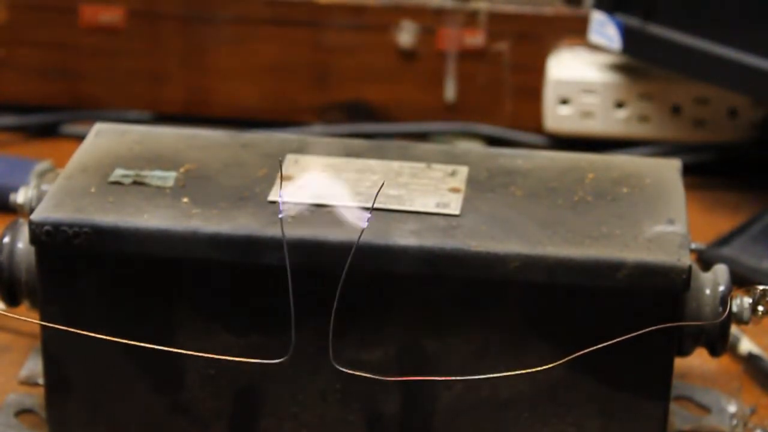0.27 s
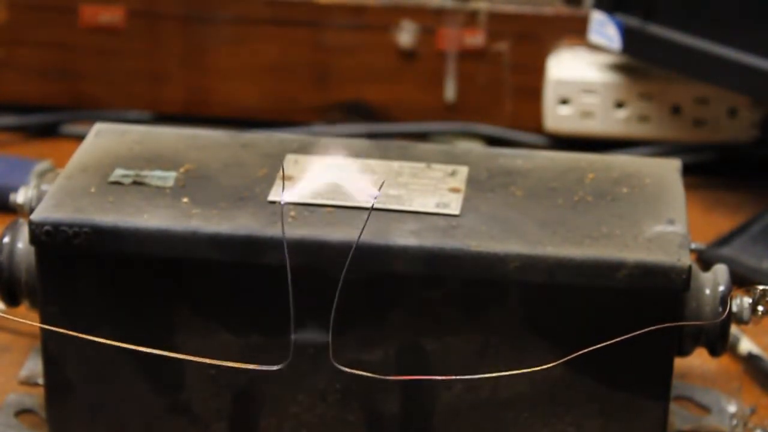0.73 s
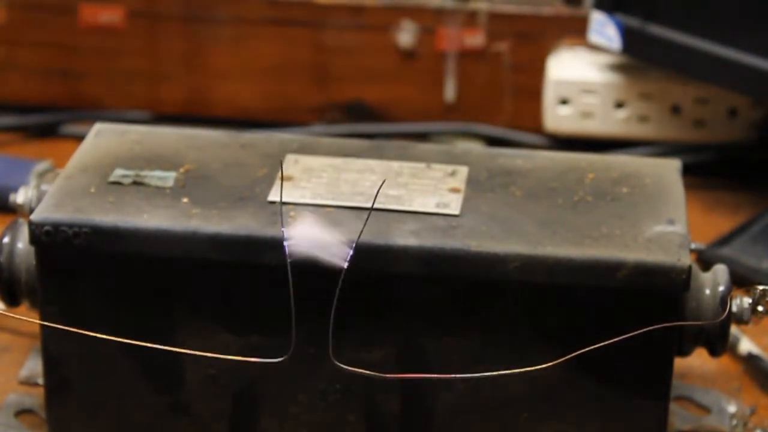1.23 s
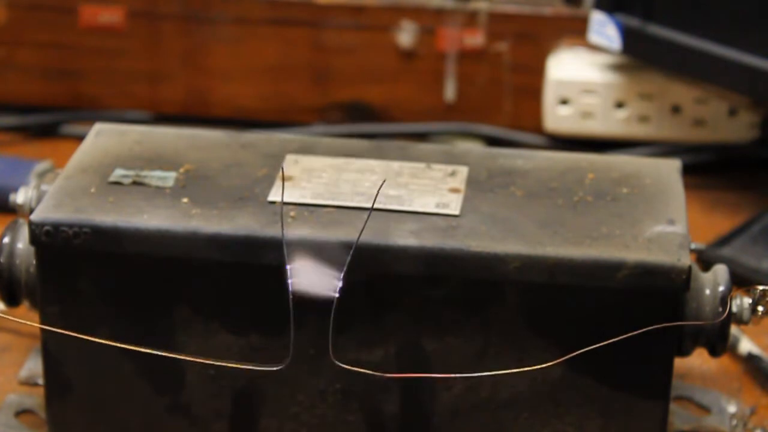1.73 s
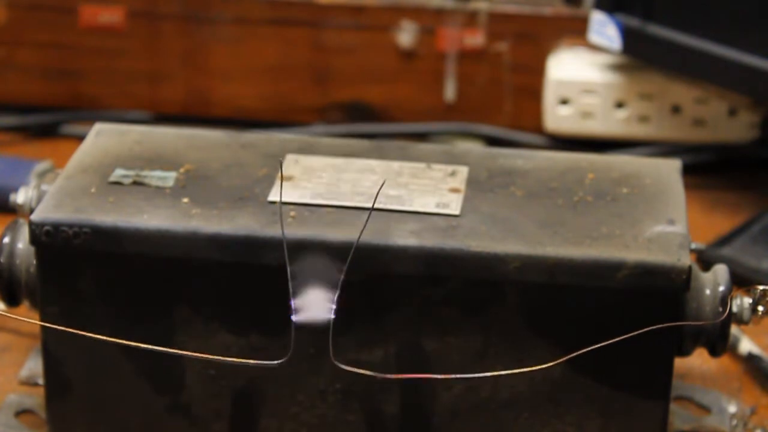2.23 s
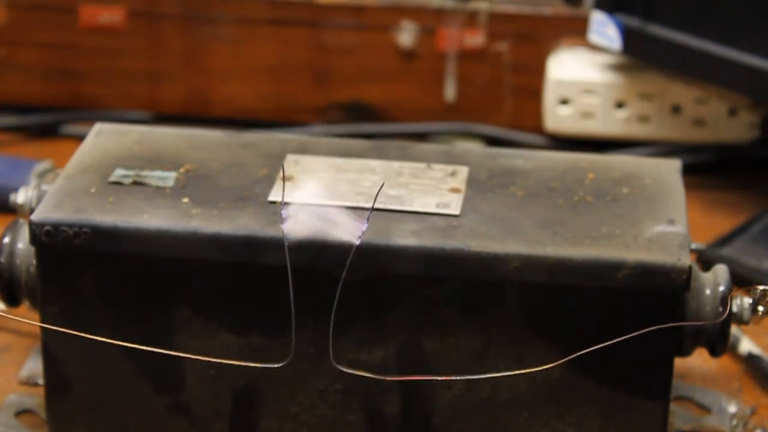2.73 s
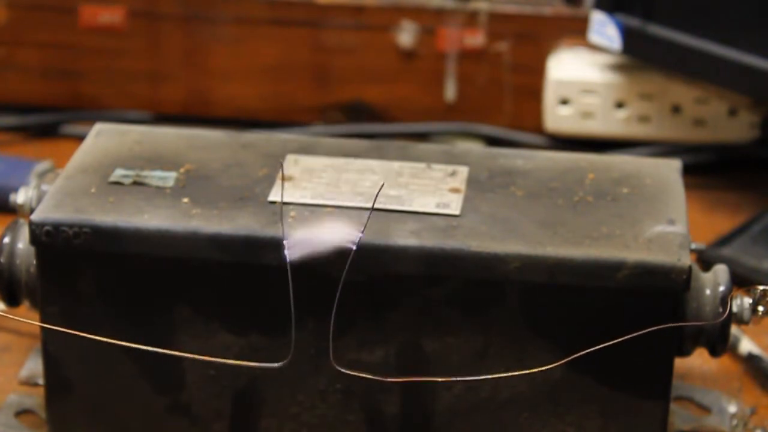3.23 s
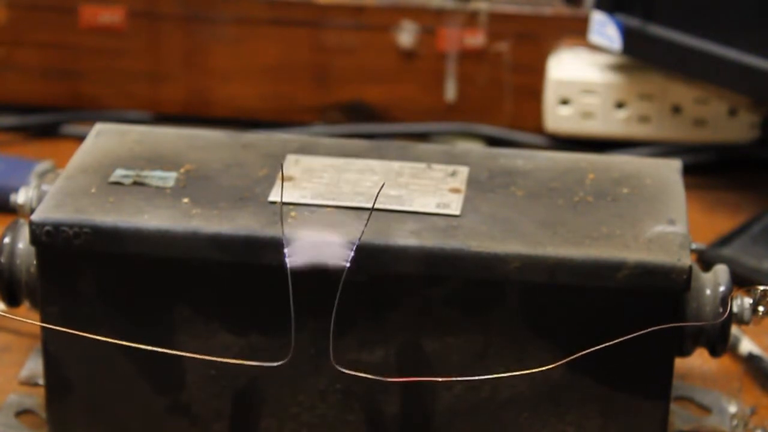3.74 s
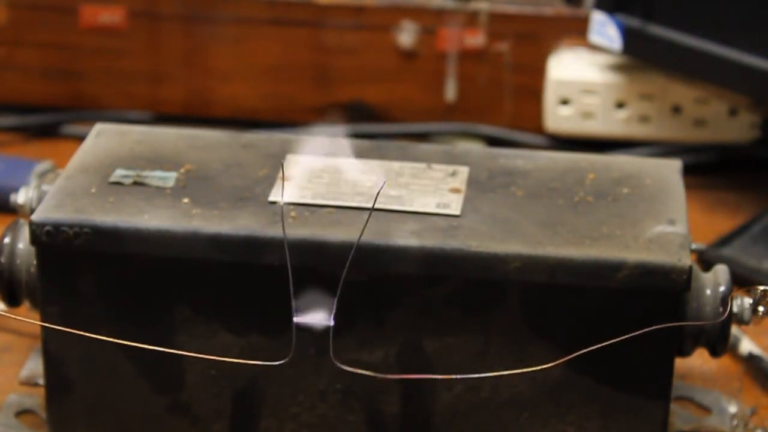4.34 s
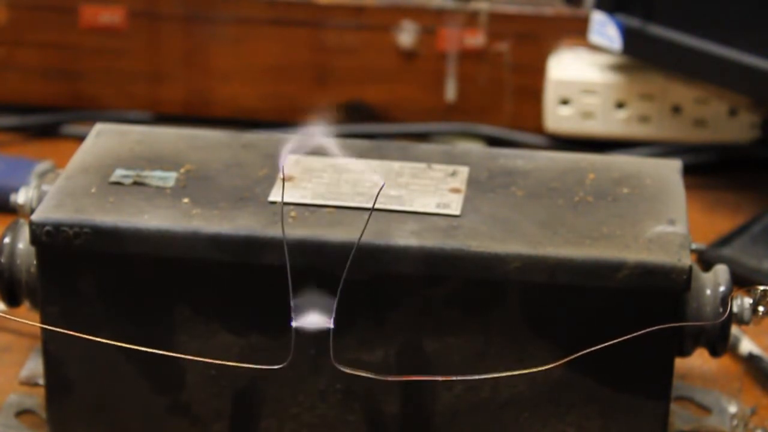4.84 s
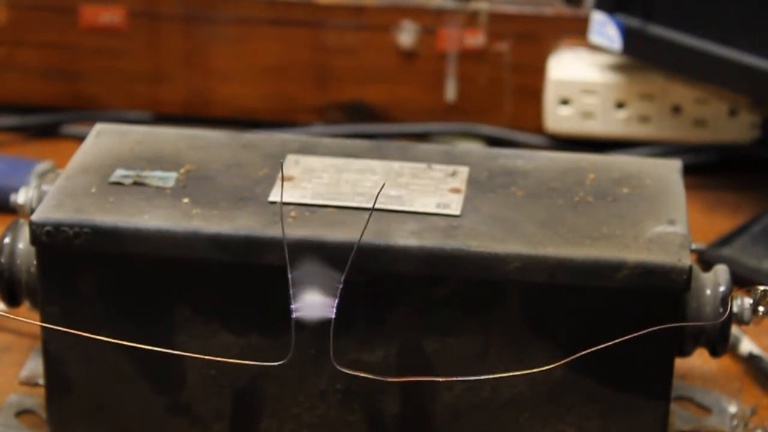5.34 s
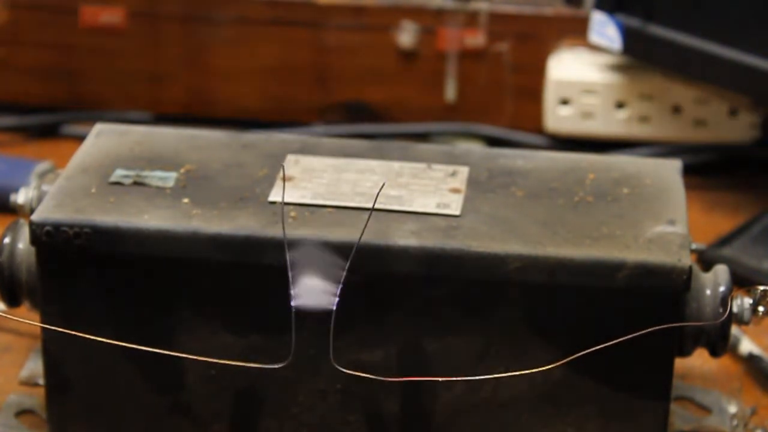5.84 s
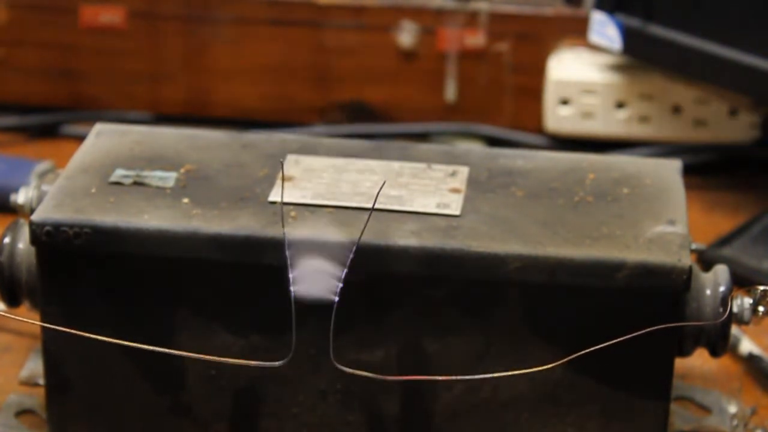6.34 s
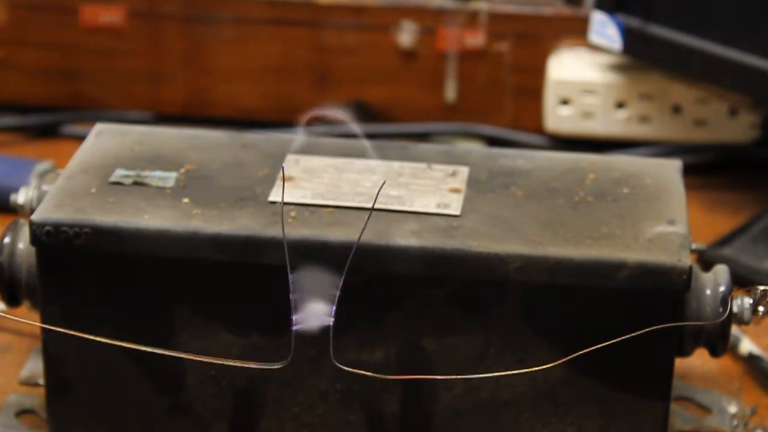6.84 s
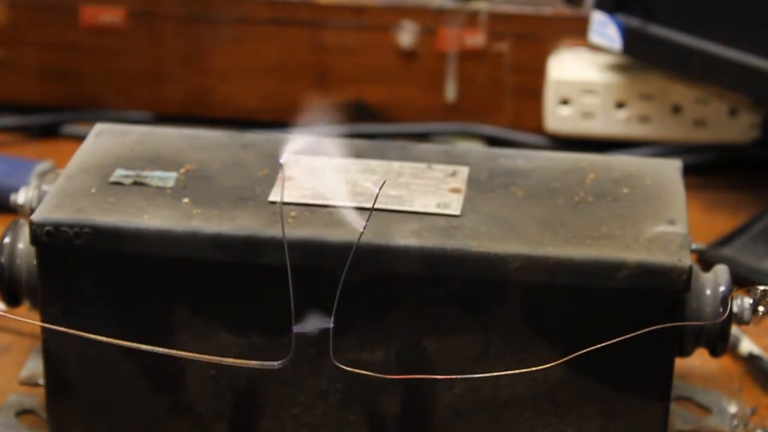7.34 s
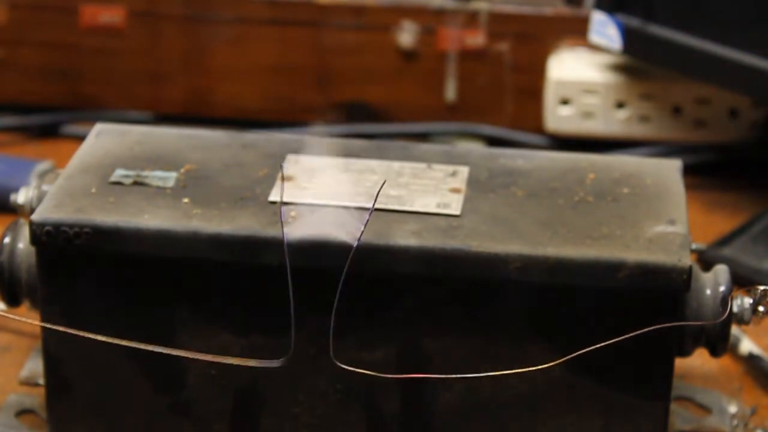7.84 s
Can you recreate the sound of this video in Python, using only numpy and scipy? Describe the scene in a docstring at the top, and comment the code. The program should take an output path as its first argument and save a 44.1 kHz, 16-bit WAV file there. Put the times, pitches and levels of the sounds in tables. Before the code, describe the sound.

Close, dry, bright electrical buzz at mains rate, repeatedly growing from faint ticking to loud crackle, each climb ending in a crisp snap.

```python
"""A small hard workshop, close to a transformer: an arc climbs between two wires in front of it, breaks
with a snap and strikes again below. It relights with a click on every half cycle of the mains; the longer
the arc, the earlier, louder and more sputtering the click. Casing and bench throw each click back, the
room adds a short tail, the arc column hums; behind lie noise, two whines and one dull scuff."""
import sys
import numpy as np
from scipy import signal
from scipy.fft import rfft, irfft
from scipy.io import wavfile
from scipy.ndimage import uniform_filter1d

SR = 44100
rng = np.random.default_rng(int(sys.argv[2]) if len(sys.argv) > 2 else 0)


def master_out(mix):
    """Clip the mix to full scale and print it as 16-bit PCM to the path in sys.argv[1]."""
    frames = np.transpose(np.atleast_2d(mix))
    ceiling = np.clip(frames, -1, 1)
    pcm = np.round(ceiling * 32767).astype(np.int16)
    wavfile.write(sys.argv[1], SR, pcm)


N = 356328

# half cycles a second; the first instant from which leads are counted back
PULSE_HZ, FIRST_S = 120.047, .0051

# The break that ends each climb: (time [s], level [dB], share of the lower part, below 8 kHz [dB],
# thump strength [dB], thump frequency [Hz])
SNAP_EVENTS = [(0.1791, -28.2, -7.5, -44.0, 3130), (0.4125, -26.5, -11.7, -45.7, 2400),
               (0.6208, -27.4, -9.7, -46.5, 2300), (0.8451, -24.8, -9.2, -42.3, 3140),
               (1.0037, -25.2, -10.8, -41.4, 3010), (1.2119, -30.9, -5.2, -49.9, 2290),
               (1.5122, -25.8, -10.1, -43.3, 2950), (1.7285, -26.3, -9.8, -47.5, 3030),
               (2.0615, -23.2, -3.1, -42.0, 3460), (2.2698, -26.3, -8.7, -41.3, 3060),
               (2.4701, -26.5, -9.9, -45.0, 3120), (2.6701, -26.3, -8.8, -43.8, 2990),
               (2.9363, -26.3, -9.9, -41.6, 2960), (3.1361, -25.3, -8.8, -49.1, 2280),
               (3.3862, -25.8, -10.6, -45.5, 3040), (3.6445, -26.6, -10.5, -48.0, 2240),
               (3.9109, -26.9, -8.1, -46.7, 2950), (4.1695, -26.9, -9.9, -42.1, 2890),
               (4.4023, -27.5, -8.4, -43.6, 2990), (4.6441, -28.2, -8.4, -40.4, 2980),
               (4.8942, -23.6, -3.0, -43.4, 3260), (5.1608, -29.4, -10.4, -44.9, 2980),
               (5.3771, -28.4, -8.2, -47.9, 3070), (5.6766, -25.2, -9.4, -42.4, 3100),
               (5.8604, -26.9, -9.6, -46.2, 3120), (6.0603, -29.3, -8.6, -50.4, 2330),
               (6.327, -28.5, -9.3, -47.2, 2990), (6.5186, -26.5, -11.6, -42.2, 3060),
               (6.6852, -26.3, -10.0, -43.0, 2970), (6.8849, -27.0, -9.1, -41.5, 3070),
               (7.0762, -24.1, -3.7, -44.5, 3500), (7.2601, -26.9, -11.3, -42.2, 3150),
               (7.4347, -30.6, -8.0, -45.0, 2910), (7.6097, -27.9, -10.6, -45.4, 2980),
               (7.7928, -27.7, -8.5, -44.9, 3040), (7.9847, -27.7, -11.1, -44.2, 3170)]
# The loudest relights of the long arc: (time [s], level [dB], restrike rate [1/s])
CRACK_EVENTS = [(0.1706, -30.0, 4500), (0.3292, -30.0, 10400), (0.3458, -30.2, 8600), (0.3542, -27.0, 7400),
                (0.3708, -27.1, 9800), (0.379, -30.2, 11400), (0.3957, -27.6, 6800), (0.4041, -23.1, 11000),
                (0.5459, -29.1, 11000), (0.5541, -27.0, 9000), (0.5622, -30.4, 10400),
                (0.5705, -29.6, 11000), (0.579, -28.1, 7800), (0.5873, -29.6, 4800), (0.6119, -30.0, 6400),
                (0.7624, -29.7, 10400), (0.779, -27.8, 10400), (0.7873, -28.8, 9800), (0.804, -28.0, 7800),
                (0.8204, -25.5, 8400), (0.8286, -29.5, 4500), (0.8371, -23.2, 4900), (1.1954, -29.2, 7400),
                (1.3455, -28.9, 11800), (1.362, -29.3, 12600), (1.4204, -27.8, 11000),
                (1.4287, -28.9, 6700), (1.4371, -30.0, 6400), (1.4536, -26.8, 6100), (1.4619, -29.9, 5100),
                (1.4702, -27.3, 5300), (1.4784, -29.1, 4900), (1.4867, -26.8, 6100), (1.5033, -25.2, 6300),
                (1.6619, -27.3, 11400), (1.6701, -30.2, 7500), (1.6785, -28.3, 6500), (1.6864, -27.5, 9300),
                (1.6952, -28.4, 5300), (1.7034, -24.7, 6800), (1.72, -22.9, 7800), (1.8953, -30.5, 10400),
                (1.9452, -28.4, 12200), (1.9619, -28.9, 10700), (1.9785, -28.2, 6500),
                (1.9951, -30.4, 6000), (2.0117, -27.5, 4800), (2.0198, -30.0, 6800), (2.028, -30.4, 6700),
                (2.0366, -25.2, 9800), (2.045, -26.4, 6700), (2.0532, -28.8, 5500), (2.2532, -25.6, 5300),
                (2.2616, -22.1, 7400), (2.4613, -30.7, 7100), (2.6365, -28.9, 5900), (2.6449, -29.1, 8600),
                (2.653, -29.8, 7800), (2.6612, -30.1, 7400), (2.8364, -29.4, 8200), (2.8613, -29.2, 5200),
                (2.8695, -29.3, 10700), (2.8781, -27.4, 7400), (2.8863, -27.8, 5400), (2.8946, -27.4, 6000),
                (2.9109, -28.1, 5100), (2.9278, -25.7, 6400), (3.1111, -29.3, 8400), (3.1194, -24.9, 6500),
                (3.1277, -28.2, 7400), (3.3694, -28.6, 7200), (3.3775, -27.5, 7500), (3.6109, -28.6, 7800),
                (3.6191, -25.3, 7100), (3.6274, -27.1, 8600), (3.6357, -27.5, 4600), (3.8776, -28.4, 8000),
                (3.8939, -27.0, 7500), (3.9026, -25.6, 6100), (4.1442, -30.5, 7200), (4.1524, -27.8, 4500),
                (4.1606, -26.6, 5700), (4.3937, -25.5, 6100), (4.594, -29.3, 10400), (4.6025, -30.1, 7800),
                (4.6272, -26.5, 7700), (4.6355, -23.3, 6300), (4.8604, -29.1, 7500), (4.8686, -29.8, 5700),
                (4.8773, -25.2, 7500), (4.8853, -27.8, 5700), (5.0772, -28.5, 9300), (5.0937, -28.2, 6300),
                (5.1104, -29.1, 7100), (5.1439, -27.4, 6800), (5.352, -30.4, 8800), (5.3604, -26.6, 4800),
                (5.552, -30.5, 8600), (5.5602, -27.3, 5300), (5.5768, -24.1, 6800), (5.5935, -23.5, 4800),
                (5.6101, -25.5, 6500), (5.6268, -27.2, 6900), (5.6436, -27.9, 7500), (5.6602, -24.1, 6100),
                (5.8516, -26.7, 4900), (6.0103, -27.9, 6800), (6.0268, -27.2, 6900), (6.0352, -29.4, 6700),
                (6.0433, -26.2, 5900), (6.0517, -27.3, 7400), (6.2102, -29.7, 6100), (6.2268, -28.0, 6800),
                (6.2433, -24.3, 6400), (6.26, -25.9, 6100), (6.2932, -25.1, 5800), (6.3098, -28.8, 6500),
                (6.5098, -26.5, 6500), (6.6517, -29.1, 7800), (6.66, -30.1, 5000), (6.6681, -27.4, 6800),
                (6.6764, -22.9, 6200), (6.8432, -27.7, 11800), (6.8515, -28.6, 6000), (6.8597, -28.5, 7200),
                (6.868, -29.0, 5600), (6.8762, -27.7, 5900), (7.0431, -27.7, 11000), (7.0597, -25.8, 6800),
                (7.2431, -28.2, 6500), (7.4179, -29.7, 5000), (7.5929, -27.0, 6100), (7.7597, -29.7, 10100),
                (7.7678, -25.9, 7100), (7.7761, -25.4, 11000), (7.7842, -28.6, 4600),
                (7.9262, -30.0, 10700), (7.9428, -28.0, 5800), (7.9595, -29.1, 6000), (7.976, -24.9, 9500)]
SNAP_S, CRACK_S = np.transpose(SNAP_EVENTS)[0], np.transpose(CRACK_EVENTS)[0]


def gain_of(db):
    """Amplitude factor of a level in dB."""
    return 10 ** (np.asarray(db) / 20)


def read_curve(points, hz):
    """Read a curve of (frequency, value) points along a logarithmic frequency axis."""
    f, value = np.transpose(points)
    return np.interp(np.log(hz + 1), np.log(f + 1), value)


def ring(x, hz, width_hz):
    """A resonance of gain 1 at its peak."""
    return signal.lfilter(*signal.iirpeak(hz, hz / width_hz, SR), x)


def slow_drift(per_s):
    """Random drift of rms 1: white noise through a one-pole low-pass at this rate."""
    x = signal.lfilter([1], [1, 2 * np.pi * per_s / SR - 1], rng.standard_normal(N))
    return x / x.std()


def workshop_air():
    """Steady background noise of the workshop, white noise shaped by a colour curve."""
    # Colour of the noise: (frequency [Hz], relative density [dB per Hz])
    air_colour = [(20, -15), (80, -18), (113, -6), (174, -3.5), (239, 6), (409, -1), (601, -1), (669, 1),
                  (793, -2.5), (2120, -9), (3200, -6), (5000, -6.5), (6500, -2.5), (11000, -14)]
    level_db = -49.5
    hz = np.fft.rfftfreq(N, 1 / SR)
    air = irfft(rfft(rng.standard_normal(N)) * gain_of(read_curve(air_colour, hz)), N)
    return gain_of(level_db) * air / air.std()


def whines():
    """Two whines of fixed pitch in the workshop, whose levels flicker."""
    # Whines: (frequency [Hz], mean rms level [dB])
    whine_rows = [(786., -63.5), (802., -64)]
    t = np.arange(N) / SR
    total = 0
    for hz, db in whine_rows:
        gain = gain_of(db + 2.0 * slow_drift(15.0))
        total = total + gain * np.sqrt(2) * np.sin(2 * np.pi * hz * t)
    return total


def scuff():
    """One dull scuff nearby: noise through a broad resonance twice, quick to rise, then dying away."""
    start_s, level_db, hz, width_hz, t60_s = 6.972, -37, 1380, 1500, .15
    since_s = np.maximum(np.arange(N) / SR - start_s, 0)
    noise = ring(ring(rng.standard_normal(N), hz, width_hz), hz, width_hz)
    rise = np.minimum(since_s / .008, 1)
    return noise / noise.std() * rise * gain_of(level_db - 60 * since_s / t60_s)


def room(x):
    """Six noise tails of energy 1, fed with cycling gains; each band dies at its own speed."""
    # Decay of the room: (frequency [Hz], t60 [s])
    room_decay = [(1000, 0.24), (4000, 0.11), (9000, 0.084), (15000, 0.071)]
    hz, t, z = signal.stft(rng.standard_normal((6, SR // 3)), SR, nperseg=128)
    decay = gain_of(-60 * t / read_curve(room_decay, hz)[:, None])
    tails = signal.istft(z * decay, SR, nperseg=128)[1]
    tails = tails * np.minimum(np.arange(tails.shape[1]) / 220., 1) ** 2  # the walls answer after a few ms
    tails = tails / np.linalg.norm(tails, axis=1, keepdims=True)
    # two groups of three tails, each group cycling at its own rate
    cycle_hz = np.repeat([2.3, 4.2], 3)[:, None]
    turn = 2 * np.pi * (cycle_hz * np.arange(N) / SR + np.arange(6)[:, None] / 3)
    fed = np.sqrt(1 / 3) * np.cos(turn) * x
    return signal.oaconvolve(fed, tails, axes=1)[:, :N].sum(0)


def arc(s):
    """Lead (ms), click level (dB) and polarity offset (dB) of the climbing arc at the times s."""
    # One row a climb, ended by the snap of the same row: (time the arc leaves the narrow gap [s],
    # time it flares [s], lead at the flare [ms], click level when just struck [dB], level at the flare [dB],
    # swell midway from flare to break [dB], level at the break [dB],
    # offset between the polarities, plus for one and minus for the other: at the flare [dB], at the break [dB])
    climb_rows = [(0.122, 0.143, 0.7, -43.8, -38.9, 1.9, -32.5, 0.8, 2.0),
                  (0.305, 0.313, 0.7, -43.8, -31.9, -0.5, -26.5, -0.9, 1.8),
                  (0.547, 0.555, 0.8, -43.8, -27.6, -1.0, -31.1, 0.1, -0.1),
                  (0.746, 0.755, 0.7, -43.7, -32.2, 0.0, -27.1, -2.9, 3.6),
                  (0.976, 0.996, 1.0, -43.5, -34.3, 0.0, -34.3, 1.2, 0.6),
                  (1.134, 1.146, 1.0, -44.6, -33.1, -3.2, -29.8, -0.0, -1.6),
                  (1.325, 1.334, 0.7, -42.9, -31.9, 0.1, -28.7, -1.7, 2.9),
                  (1.642, 1.65, 0.8, -43.0, -33.8, 4.0, -31.5, -3.6, 4.4),
                  (1.859, 1.896, 0.7, -41.4, -33.6, -0.1, -27.4, -2.4, 0.0),
                  (2.217, 2.246, 1.0, -42.2, -32.3, 2.7, -23.5, -1.2, -0.9),
                  (2.396, 2.433, 1.0, -43.6, -34.5, -1.0, -31.6, -2.0, -0.5),
                  (2.6, 2.621, 1.0, -44.2, -36.6, 3.8, -30.7, 0.8, -0.1),
                  (2.796, 2.804, 0.9, -44.0, -33.3, 1.8, -29.6, 1.0, -2.6),
                  (3.062, 3.104, 1.0, -43.2, -35.1, 3.3, -26.5, -1.0, 1.8),
                  (3.316, 3.35, 1.0, -43.8, -33.4, -2.1, -26.6, -0.5, 1.3),
                  (3.525, 3.6, 1.0, -43.4, -35.8, 5.3, -28.5, -0.2, 0.9),
                  (3.841, 3.849, 0.9, -44.6, -33.9, -2.3, -25.6, -2.3, -1.1),
                  (4.054, 4.116, 0.7, -43.5, -37.8, -1.2, -26.5, -0.9, 0.3),
                  (4.308, 4.358, 0.7, -44.0, -38.2, -3.0, -27.6, 0.5, -1.3),
                  (4.541, 4.595, 0.9, -44.4, -29.4, -4.4, -23.7, 0.0, -0.1),
                  (4.787, 4.824, 0.7, -43.8, -38.3, 0.6, -26.2, -0.5, -1.7),
                  (5.032, 5.07, 1.0, -46.4, -33.3, 2.5, -38.5, -3.4, -3.8),
                  (5.282, 5.311, 1.0, -44.8, -34.0, -0.8, -28.5, -1.5, -1.5),
                  (5.486, 5.565, 1.0, -42.2, -28.3, -2.2, -28.0, -4.6, -3.2),
                  (5.807, 5.815, 0.7, -43.2, -37.2, -2.2, -30.5, -1.0, 3.2),
                  (5.978, 5.994, 0.8, -43.9, -35.8, 1.9, -27.1, -3.4, -0.7),
                  (6.174, 6.199, 0.9, -44.1, -32.9, 1.2, -30.6, -4.0, -2.8),
                  (6.457, 6.482, 0.8, -44.9, -38.0, -2.0, -35.5, -1.5, -4.2),
                  (6.636, 6.661, 0.9, -43.0, -28.4, -1.1, -24.7, 1.8, -1.4),
                  (6.798, 6.827, 0.9, -43.3, -32.5, 1.7, -28.6, -1.5, -0.3),
                  (7.011, 7.04, 1.0, -44.0, -32.2, 0.1, -30.2, -3.7, -4.7),
                  (7.219, 7.231, 0.7, -43.0, -38.8, 2.8, -32.9, -2.7, -4.0),
                  (7.386, 7.411, 0.9, -44.1, -37.2, 3.0, -33.7, 1.4, 2.5),
                  (7.573, 7.585, 0.9, -43.6, -36.1, 2.9, -29.9, -2.7, -2.2),
                  (7.744, 7.773, 1.0, -43.7, -24.1, -0.6, -27.8, -0.1, -0.8),
                  (7.915, 7.927, 0.8, -43.6, -31.3, -1.1, -30.8, -1.5, -5.0),
                  (8.12, 8.16, 0.8, -43.0, -31.0, 0, -29.0, 0.0, 0.0)]
    struck_ms, out_ms, break_ms = .14, .6, 1.15  # lead when struck, out of the gap, at the break
    speed_up = 1.8  # the lead grows as this power of the time until the arc leaves the gap
    db_per_ms, full_ms = 13., .7  # before the flare the click grows with the lead, up to this lead
    flare_rise_s = .04

    breaks = np.r_[-.004, SNAP_S, 8.2]  # with the breaks before the first climb and after the last
    climb = np.searchsorted(breaks, s) - 1
    (out, flare, flare_ms, struck_db, flare_db, swell_db, last_db,
     polar_db, polar_last_db) = np.array(climb_rows)[climb].T
    struck, last = breaks[climb] + 1 / PULSE_HZ, breaks[climb + 1] - 1 / PULSE_HZ

    def share(a, b):
        return np.clip((s - a) / np.maximum(b - a, 1e-3), 0, 1)

    late = share(flare, last)
    flared = share(flare - flare_rise_s, flare) ** 2
    lead_ms = (struck_ms + (out_ms - struck_ms) * share(struck, out) ** speed_up
               + (flare_ms - out_ms) * share(out, flare) + (break_ms - flare_ms) * late)
    quiet_db = struck_db + db_per_ms * (np.minimum(lead_ms, full_ms) - struck_ms)
    loud_db = flare_db + (last_db - flare_db) * late + swell_db * np.sin(np.pi * late)
    level_db = quiet_db + flared * (loud_db - quiet_db)
    return lead_ms, level_db, flared * (polar_db + (polar_last_db - polar_db) * late)


def hum():
    """Heat pulses of the arc column push the air on every relight, harder as the arc grows longer."""
    # Partials: (multiple of the pulse rate, mean rms level at .15 ms lead [dB],
    # level extrapolated to 1.65 ms lead [dB])
    hum_partials = [(1, -69, -55), (2, -63.5, -46.5), (3, -67, -53), (4, -68, -53.5), (5, -62, -48.5),
                    (6, -73.5, -51.5), (7, -72, -62), (8, -69, -51), (10, -100, -52), (11, -104, -46),
                    (12, -77, -56), (13, -76, -58)]
    t = np.arange(N) / SR
    lead_ms = uniform_filter1d(arc(np.maximum(t - .008, 0))[0], size=800)
    turn = 2 * np.pi * PULSE_HZ * (t - FIRST_S + lead_ms / 1000)
    length = uniform_filter1d(np.clip((lead_ms - .15) / 1.5, 0, 1.1), 600)
    total = 0
    for k, short_db, long_db in hum_partials:
        level_db = short_db + (long_db - short_db) * length + 1.3 * slow_drift(2.3)
        total = total + gain_of(level_db) * np.cos(k * turn)
    return np.sqrt(2) * total


def clicks(s, size):
    """A click is a windowed sinc, placed between samples at the exact time."""
    at = np.ravel(s) * SR
    near = np.floor(at)[:, None] + np.arange(-7, 9)
    off = near - at[:, None]
    shape = np.ravel(size)[:, None] * np.sinc(off) * np.cos(np.pi * off / 16) ** 2
    place = np.clip(near, 0, N).astype(int)
    return np.bincount(place.ravel(), shape.ravel(), N + 1)[:N]


def echoed(s, size, lead_ms):
    """Direct click and early echoes of casing and bench; path delays shift and echoes fade as the arc rises."""
    # Echoes: (delay [ms], growth of the delay per lead [ms/ms], level [dB],
    # loss per lead once the arc stands above the casing [dB/ms])
    echo_rows = [(.39, .16, -4.5, 4), (.74, .07, -6, 8), (1.7, 0, -9.5, 11), (3.9, .05, -15, 5),
                 (4.55, -.06, -16, 5), (4.8, .08, -16, 5)]
    above_ms = np.maximum(lead_ms - .75, 0)

    def echo(ms, grow, db, lost_db):
        return clicks(s + (ms + grow * lead_ms) / 1000, size * gain_of(db - lost_db * above_ms))

    # the strongest echo; it returns only the treble
    treble = signal.butter(2, 3600, "high", fs=SR)
    bench = signal.lfilter(*treble, echo(ms=2.69, grow=-.04, db=-2.5, lost_db=5))
    return clicks(s, size) + bench + sum(echo(*row) for row in echo_rows)


def spark_response(points):
    """Minimum-phase response of energy 1 with the given colour."""
    hz = abs(np.fft.fftfreq(2048, 1 / SR))
    log_gain = np.log(gain_of(np.maximum(read_curve(points, hz), -60)))
    taps = np.fft.ifft(np.exp(np.conj(signal.hilbert(log_gain)))).real[:512]
    return taps / np.linalg.norm(taps)


def bursts(start, level_db, luck, lead_ms, per_s, more_db, train_ms, colour):
    """Sparks, each with quickening restrikes and echoes; level is the rms of a burst over one half cycle."""
    quicken = .045  # each gap in a train is shorter than the last by about this share, chance aside
    spread = .059 * luck[:, :1] + (.07 + .11 * lead_ms) * luck[:, 1:15]
    gaps = np.exp(spread - quicken * np.arange(-4, 10)) / per_s
    after = np.cumsum(gaps, 1) - gaps[:, :1]
    size = gain_of(more_db - 8 * (after * 1000 / train_ms) ** 3 + 2.6 * luck[:, 15:29])
    size[:, 0] = 1  # the first spark
    response = spark_response(colour)

    def sound(a):
        return signal.oaconvolve(echoed(start + after, a, lead_ms + 0 * after), response)[:N]

    # sound once at unit size to find the power of each burst, then again at its level
    energy = np.cumsum(sound(size) ** 2)
    at = np.minimum(start * SR, N - 150).astype(int)
    own = (energy[at + 140] - energy[at - 5]) * PULSE_HZ / SR
    return sound(size * gain_of(level_db) / np.sqrt(own + 1e-9))


def snaps():
    """A strong, fast burst in the narrow gap, some duller than others, and a short ringing thump."""
    # Lower part of a snap at the microphone: (frequency [Hz], level [dB])
    dull_colour = [(400, -52), (1500, -16), (2500, -9), (4200, -12.5), (6500, -9.5), (9500, -36)]
    # Upper part: (frequency [Hz], level [dB])
    bright_colour = [(3000, -63), (6000, -9), (9000, 0.5), (13000, 4.5), (15000, 0), (16000, -17)]
    thump_width_hz = 380
    s, db, dull_db, thump_db, thump_hz = np.transpose(SNAP_EVENTS)[:, :, None]
    luck = rng.standard_normal((len(s), 30))
    bright_db = 10 * np.log10(1 - gain_of(dull_db) ** 2)  # the rest of the energy
    dull = bursts(s, db + dull_db, luck, lead_ms=1.57, per_s=6300, more_db=-2, train_ms=.7,
                  colour=dull_colour)
    bright = bursts(s, db + bright_db, luck, lead_ms=1.57, per_s=14500, more_db=-14, train_ms=.9,
                    colour=bright_colour)
    thump = sum(ring(clicks(a, gain_of(b)), hz[0], thump_width_hz)
                for a, b, hz in zip(s, thump_db, thump_hz))
    return dull + bright + thump * SR / np.sqrt(2 * np.pi * thump_width_hz * PULSE_HZ)


def cracks():
    """Loud relights of the long arc: a train of strong restrikes, each at its own pace."""
    # Fuller colour of a spark in the long arc: (frequency [Hz], level [dB])
    crack_colour = [(600, -30), (2000, -5.5), (3300, -3.5), (5000, 2.5), (9000, 0.5), (15300, -0.5),
                    (16000, -24)]
    s, db, per_s = np.transpose(CRACK_EVENTS)[:, :, None]
    next_s = FIRST_S + np.ceil((s - FIRST_S) * PULSE_HZ) / PULSE_HZ
    lead_ms = 1000 * (next_s - s)
    luck = rng.standard_normal((len(s), 30))
    return bursts(s, db, luck, lead_ms, per_s, more_db=.5, train_ms=.8, colour=crack_colour)


def relights():
    """One burst a half cycle, except where the arc snaps or cracks; restrikes slow as the arc lengthens."""
    # Restrikes after each relight: (lead [ms], rate [1/s], level against the first spark [dB],
    # length of the train [ms])
    restrike_rows = [(.1, 13300, -12, 0.79), (.45, 14400, -12.5, 0.21), (.62, 12550, -10.5, 0.52),
                     (.8, 9900, -7.5, 1), (.95, 7760, -8.5, 1), (1.15, 5000, -26.5, 1)]
    # Colour of a spark at the microphone: (frequency [Hz], level [dB])
    click_colour = [(500, -30.5), (950, -7.5), (2100, -12.5), (3300, -4), (4400, 2), (5500, 3.5),
                    (8000, 1.5), (12000, 0), (15300, -0.5), (16000, -22)]
    scatter_db_per_ms, ceiling_db = 1.5, -31.3
    settle_ms, settle_relights = .14, 6.  # a fresh arc relights late and early in turn, then settles

    k = np.arange(int(N / SR * PULSE_HZ))
    k = np.setdiff1d(k, np.round((np.r_[SNAP_S, CRACK_S] - FIRST_S) * PULSE_HZ))
    lead_ms, level_db, polar_db = (c[:, None] for c in arc(FIRST_S + k / PULSE_HZ))
    level_db = level_db + scatter_db_per_ms * lead_ms * rng.standard_normal(lead_ms.shape)
    sign = (-1.) ** k[:, None]
    # each train resembles the one two before it, mostly of the same polarity
    luck = signal.lfilter([.5], [1, 0, -.86], rng.standard_normal((len(k), 30)), axis=0)

    columns = np.transpose(restrike_rows)
    per_s, more_db, train_ms = (np.interp(lead_ms, columns[0], c) for c in columns[1:])
    more_db = np.minimum(more_db + 3 * sign * polar_db, 1.5)  # the louder polarity sputters more
    # a sputtering arc relights less evenly
    wander_ms = .025 * sign + .025 * gain_of(more_db) * luck[:, 29:]

    # relights counted from the first one after each snap
    index = np.arange(len(k))
    fresh = np.isin(k - 1, np.round((SNAP_S - FIRST_S) * PULSE_HZ))
    since = (index - np.maximum.accumulate(index * fresh))[:, None]
    wander_ms = wander_ms - settle_ms * (-1.) ** since * np.exp(-since / settle_relights)

    start = FIRST_S + k[:, None] / PULSE_HZ - (lead_ms + wander_ms) / 1000
    level_db = np.minimum(level_db + sign * polar_db, ceiling_db)
    return bursts(start, level_db, luck, lead_ms, per_s, more_db, train_ms, click_colour)


def scene():
    """The arc close by with its room tail and hum, over the workshop behind."""
    room_db = -7
    sparks = relights() + cracks() + snaps()
    near = sparks + gain_of(room_db) * room(sparks) + hum()
    # a small arc radiates no deep bass
    near = signal.sosfilt(signal.butter(4, 95, "high", fs=SR, output="sos"), near)
    return (near + workshop_air() + whines() + scuff())[None]


def record(dry):
    """The microphone inverts the pressure; then a steep low-pass limits the band."""
    edge_hz = 15950
    low_pass = signal.firwin(511, edge_hz, window=("kaiser", 9), fs=SR)
    return signal.oaconvolve(-dry, low_pass[None], "same")


dry = scene()
out = record(dry)
master_out(out)
```